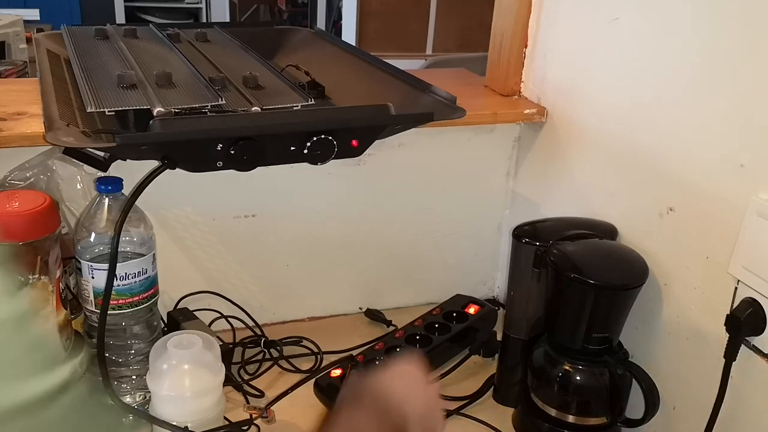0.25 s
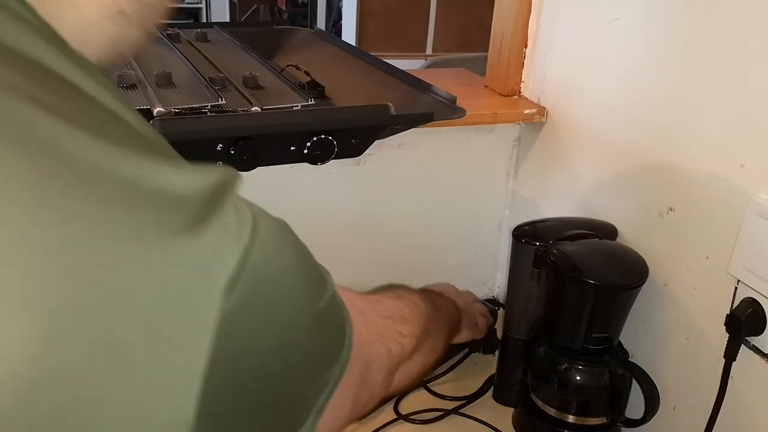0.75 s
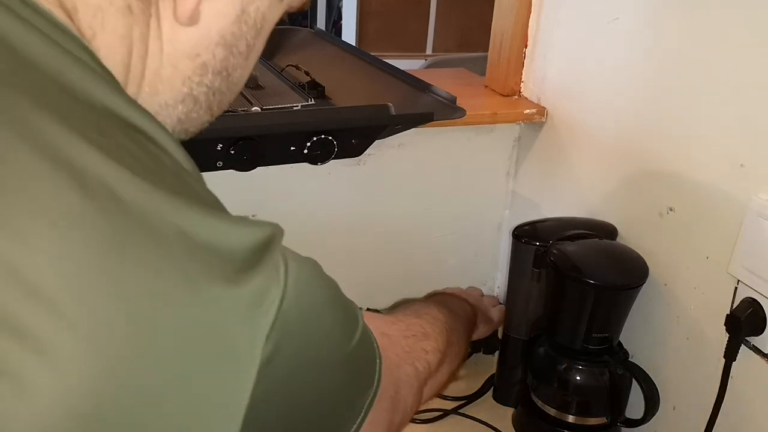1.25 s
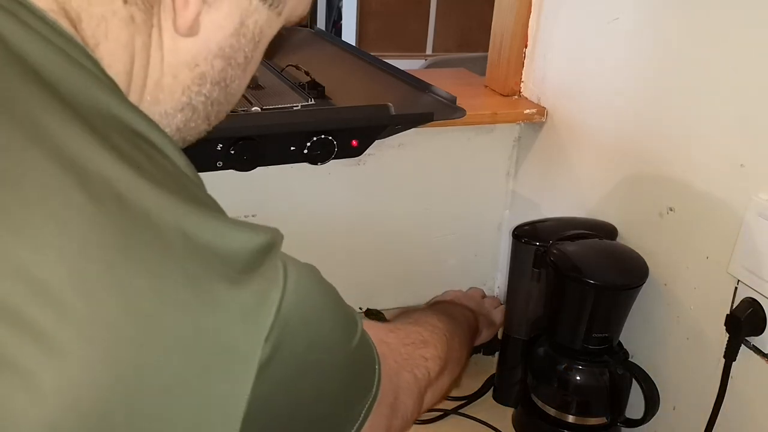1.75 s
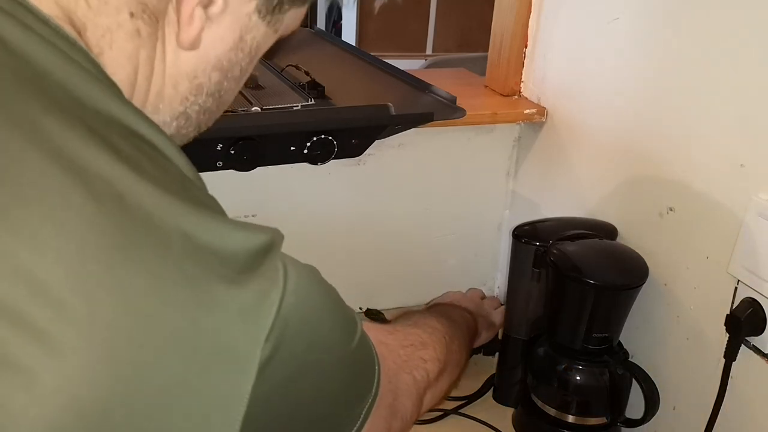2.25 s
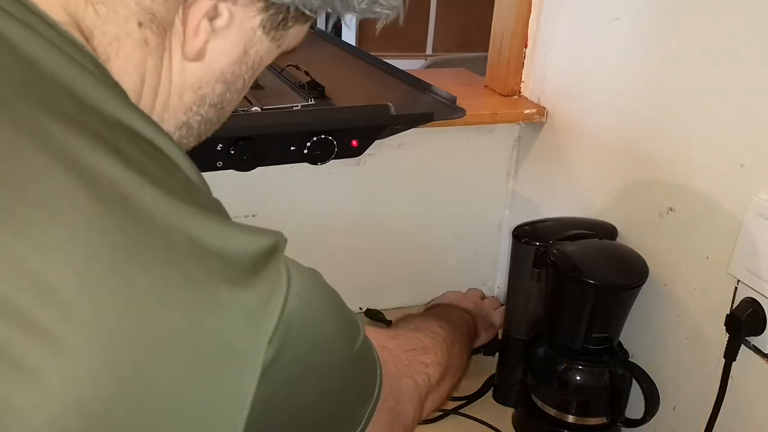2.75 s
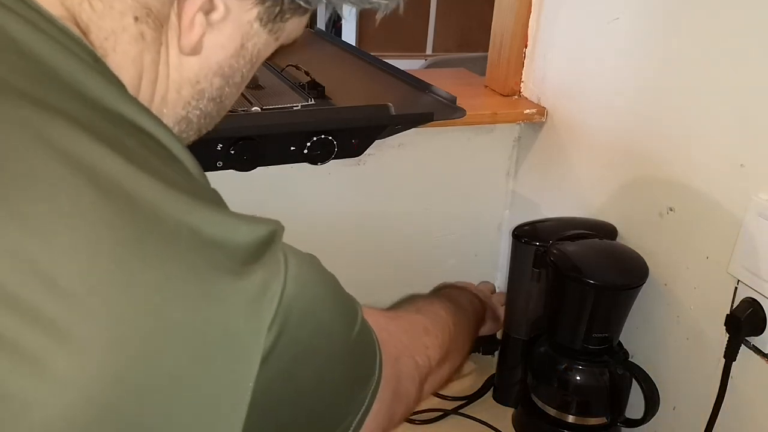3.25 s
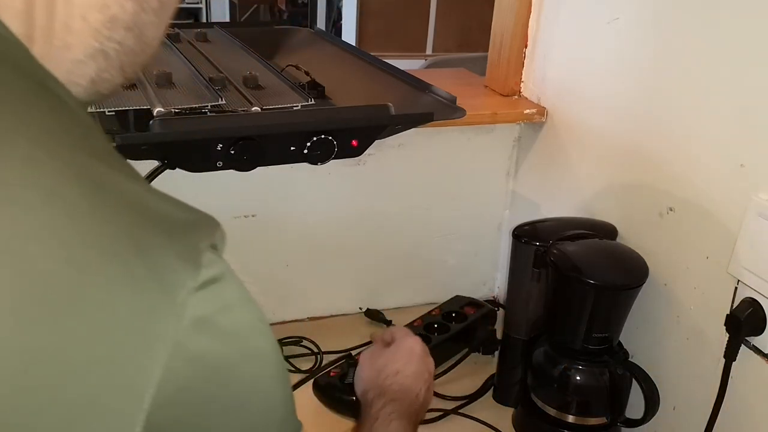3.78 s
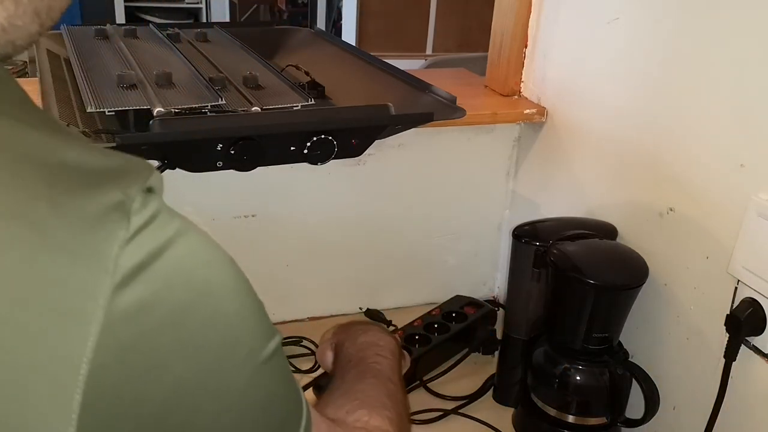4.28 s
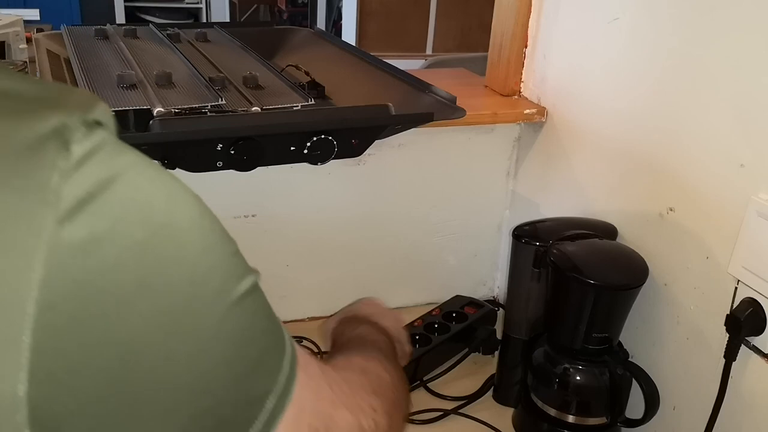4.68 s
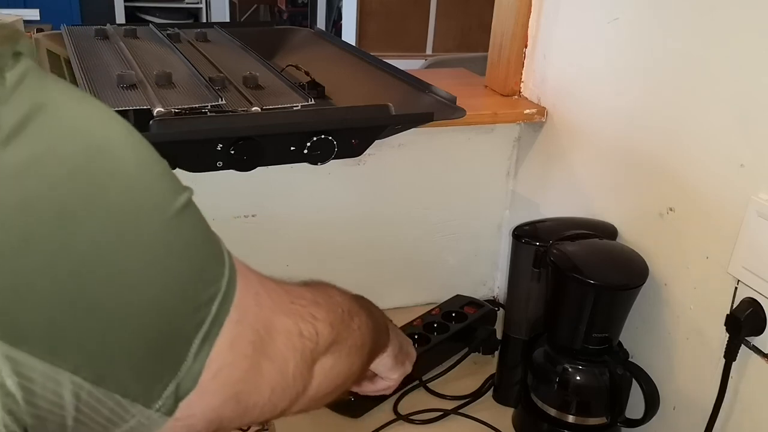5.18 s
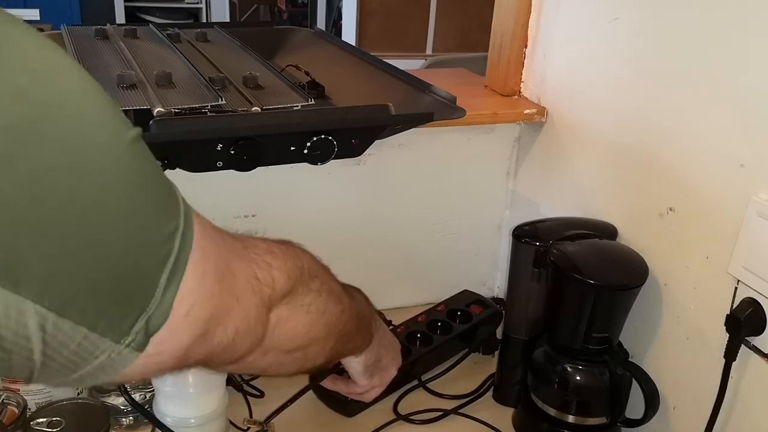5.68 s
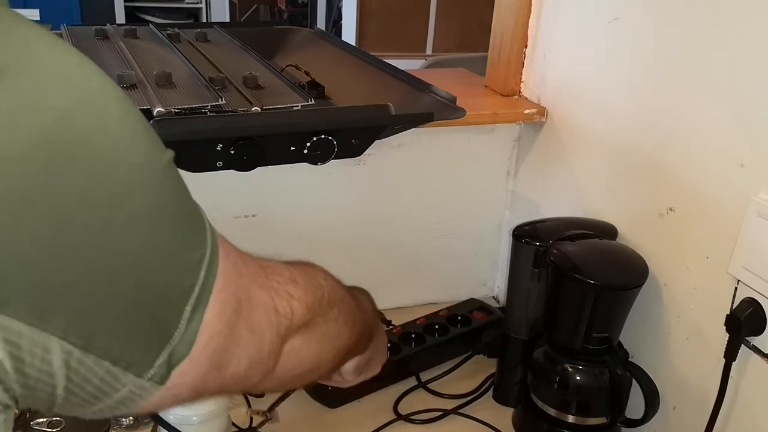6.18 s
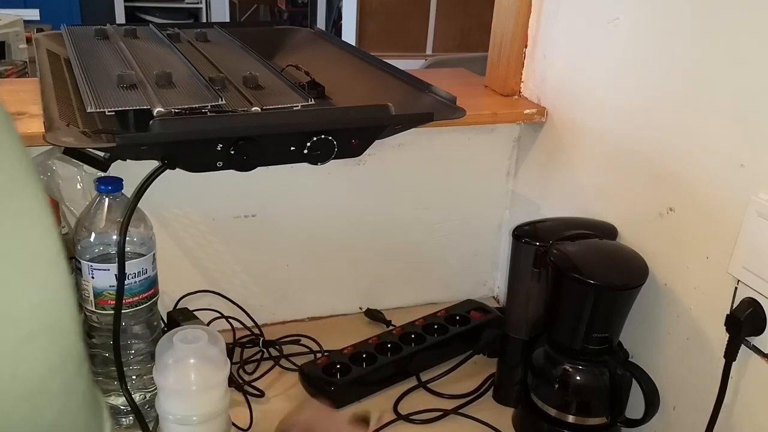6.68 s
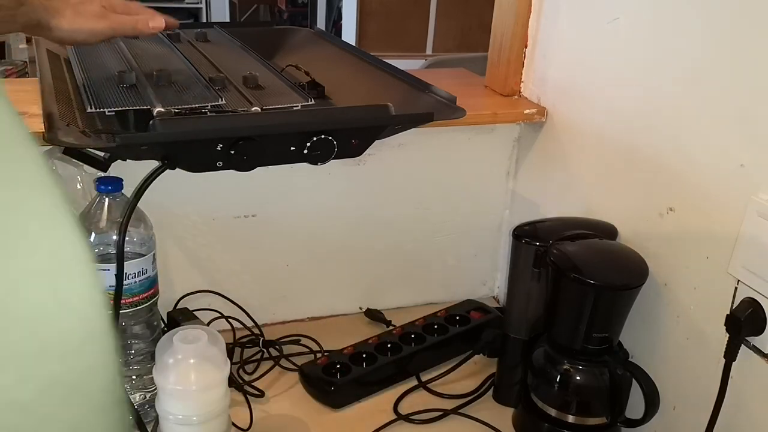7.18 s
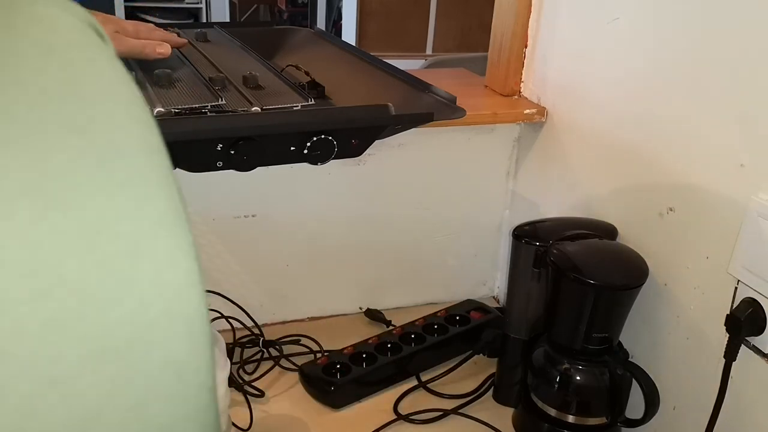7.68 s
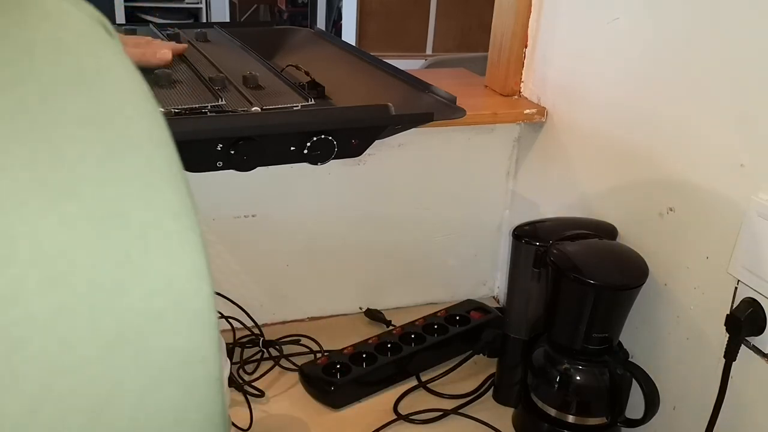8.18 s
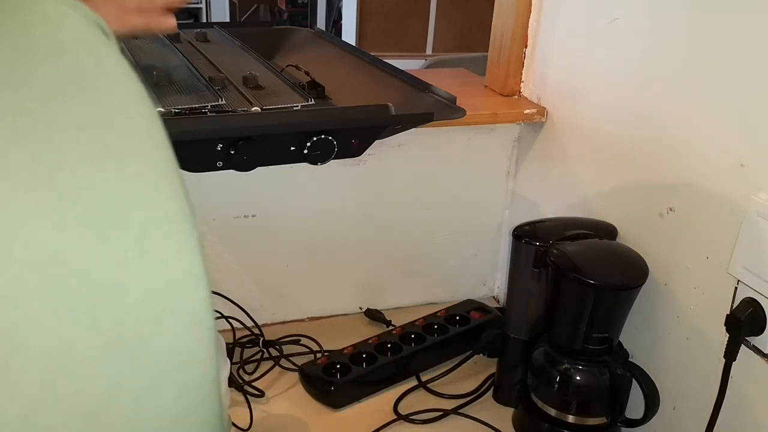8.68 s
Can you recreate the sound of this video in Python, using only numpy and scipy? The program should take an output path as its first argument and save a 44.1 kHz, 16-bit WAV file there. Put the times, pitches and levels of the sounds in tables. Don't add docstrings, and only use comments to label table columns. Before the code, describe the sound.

A quiet small hard room with a faint hush and very deep, barely audible rumble. A small crisp click opens at 0.0 s, followed by soft cloth rustle and finger drags. A duller plastic clack comes at 0.8 s, a thin bright click at 1.3 s with a faint cable rub, then near stillness. At 3.0 s a tiny slip leads to a sharp click at 3.07, and a fuller clack follows at 3.4. Faint fumbling, then a thin bright metallic click at 4.5. Minor taps lead into 5.6 s. Light scrapes from 5.9 build to the loudest event, a piercing switch snap at 6.1 with a heavier plastic knock right behind it and a short lively echo. Cloth swishes at 6.7, a solid mid-pitched clack lands at 7.3, and soft brushing taps on a metal tray come at 8.3, fading to quiet hush by 9.

```python
import sys
import numpy as np
from scipy import signal
from scipy.fft import rfft, irfft
from scipy.io import wavfile
from scipy.ndimage import uniform_filter1d

SR = 44100
rng = np.random.default_rng(int(sys.argv[2]) if len(sys.argv) > 2 else 0)


def undo_db(level):
    steps = np.asarray(level, float) / 20
    return 10 ** steps


def dump_mix(stems):
    frames = np.atleast_2d(stems).T
    limited = np.clip(frames, -1, 1)
    pcm = np.round(limited * 32767).astype(np.int16)
    wavfile.write(sys.argv[1], SR, pcm)


N = 393813


def unit(x):
    return x / np.sqrt(np.mean(x ** 2))


def colour(x, table):
    points_hz, points_db = np.array(table).T
    hz = np.maximum(np.fft.rfftfreq(len(x), 1 / SR), 1)
    gain = undo_db(np.interp(np.log(hz), np.log(points_hz), points_db))
    return irfft(rfft(x) * gain, len(x))


def band(x, lo_hz, hi_hz):
    sos = signal.butter(2, [lo_hz, min(hi_hz, .45 * SR)], "bandpass", fs=SR, output="sos")
    return unit(signal.sosfilt(sos, x))


def walk(rate_hz):
    hold = int(SR / rate_hz)
    steps = np.repeat(rng.standard_normal(N // hold + 1), hold)
    smooth = uniform_filter1d(uniform_filter1d(steps, hold), hold)
    return unit(smooth[:N])


def modes(table):
    hz, db, t60_s = np.array(table).T[:, :, None]
    t = np.arange(SR // 2) / SR
    return undo_db(db) * np.sin(2 * np.pi * hz * t) * np.exp(-np.log(1000) * t / t60_s)


def damped(table):
    return [(hz, db, 11 / hz) for hz, db in table]


def rattle(noise, ms, rise=0.14):
    t = np.arange(len(noise)) / SR / (max(ms, .5) / 1000)
    return noise * (1 - np.exp(-t / rise)) * np.exp(-t)


def add(out, s, x, db):
    i = int(s * SR)
    x = x[:N - i]
    out[i:i + len(x)] += x * undo_db(db) / np.max(np.abs(x))


def air():
    # (f/Hz, level/dB)
    hush = [(18, -32), (30, -2.5), (53, -24.5), (71, -14.5), (93, -29.5), (145, -24.5), (287, -40),
            (345, -36.5), (384, -36.5), (632, -46), (2290, -56.5), (9460, -58), (16000, -60)]
    tone = unit(colour(rng.standard_normal(N), hush))
    return undo_db(-58.5 + 1.0 * walk(2.1)) * tone


def rumble():
    # (t/s, level/dB)
    trembling = [(0.0, -52), (0.17, -45.5), (0.37, -63), (0.47, -52), (2.11, -49), (2.41, -70),
                 (2.64, -48.5), (3.21, -60), (3.53, -45), (3.78, -58), (5.89, -61), (6.04, -49),
                 (6.52, -64.5), (6.96, -46), (7.09, -55.5), (8.93, -56)]
    hz = 18.0 + 0.96 * walk(3.2)
    s, db = np.array(trembling).T
    level_db = np.interp(np.arange(N) / SR, s, db)
    return undo_db(level_db) * np.sqrt(2) * np.sin(2 * np.pi * np.cumsum(hz) / SR)


def rustle():
    # (t/s, fade/s, cloth hiss level/dB, cable shuffle level/dB)
    moves = [(0, 0.046, -81, -70), (.1, 0.28, -68, -84), (.75, 0.14, -78, -88), (1.2, 0.47, -82.5, -81.5),
             (3.3, 0.33, -76.5, -82), (4.45, 0.27, -82.5, -84), (5.18, 0.18, -77.5, -83.5),
             (5.6, 0.11, -84.5, -82), (6.05, 0.12, -76.5, -82), (6.5, 0.33, -72, -72),
             (6.7, .06, -59.5, -102), (6.95, 0.06, -68, -86), (7.15, 0.14, -71.5, -81),
             (7.6, 0.21, -85, -79), (8.4, 0.092, -74, -75)]
    still_cloth_db, still_cables_db = -88.5, -99
    s, fade_s, cloth_db, cables_db = np.array(moves).T
    swell = np.exp(-np.abs(np.arange(N)[:, None] / SR - s) / fade_s)
    cloth = swell @ undo_db(cloth_db) + undo_db(still_cloth_db)
    cloth = cloth * undo_db(-3 + 1.5 * walk(7.5)) * band(rng.standard_normal(N), 5000, 14000)
    cables = swell @ undo_db(cables_db) + undo_db(still_cables_db)
    cables = cables * undo_db(2 * walk(31)) * band(rng.standard_normal(N), 250, 1500)
    return cloth + cables


def rings():
    # (f/Hz, level/dB)
    tray_modes = [(660, -60), (2200, -66), (4200, -61.5), (4700, -69), (6450, -63)]
    # (t/s, f/Hz, level/dB, scrape/ms)
    squeaks = [
        (1.19, 2060, -74.5, 83),
        (1.6, 2005, -78, 200),
    ]
    # (t/s, f/Hz, level/dB, scrape/ms)
    free_parts = [(0.806, 790, -40, 18), (0.85, 866, -36.5, 24), (1.344, 773, -47.5, 25),
                  (3.067, 1594, -35, 9.2), (4.521, 5950, -27.5, 8.9), (4.52, 1650, -42, 8),
                  (5.624, 423, -51, 27), (5.82, 1646, -61, 12), (7.345, 556, -37, 15)]
    # (t/s, f/Hz, level/dB, scrape/ms)
    held_parts = [(0.027, 11400, -34, 16), (0.028, 2380, -45, 11), (0.028, 4000, -45, 7.1),
                  (0.82, 953, -29.5, 32), (1.338, 6940, -36, 21), (1.34, 7700, -44.5, 13),
                  (1.34, 1040, -50.5, 18), (3.03, 1350, -40, 9.9), (3.032, 830, -42, 29),
                  (3.067, 1150, -37, 11.4), (3.066, 11800, -23.5, 6.5), (4.2, 2050, -64.5, 34),
                  (4.392, 2320, -65, 9), (4.5, 1290, -57, 30), (4.522, 2120, -44, 12),
                  (4.519, 2760, -33.5, 4.3), (6.076, 1280, -32.5, 9.8), (6.098, 2606, -16.5, 7.4),
                  (6.098, 11700, -11, 12), (6.545, 1390, -47.5, 8.4), (6.668, 9000, -49.5, 3.4),
                  (7.336, 724, -23, 5), (7.336, 2190, -28, 5.4), (7.34, 1444, -27, 21.4)]
    tray = [(8.33, hz, db, 170) for hz, db in tray_modes]
    out = np.zeros(N)
    for table, cycles in ((tray + squeaks, 150), (free_parts, 45), (held_parts, 24)):
        scrapes = rng.standard_normal((len(table), 12000))
        for (s, hz, db, ms), noise in zip(table, scrapes):
            push = rattle(noise, ms / 2, rise=0.85)
            ring = modes([(hz, 0, cycles / hz)])[0]
            add(out, s, signal.fftconvolve(push, ring), db)
    return out


def blows(table, ms, rise, spot_db=1.5):
    # (f/Hz, level/dB, t60/s)
    counter = [(86.4, -7.5, 0.33), (124.94, -7, .2), (180.9, -5.5, 0.29), (193.4, -11, 0.42),
               (229.2, 2.5, 0.16), (352, -11.5, 0.33)]
    # (f/Hz, level/dB, t60/s)
    case = [(447, -9.5, 0.087), (504, -10.5, 0.18), (602.5, 1, 0.051), (707, -1.5, 0.046), (792, -1.5, .03),
            (942, 0.5, 0.023)]
    # (f/Hz, level/dB)
    rocker = [(1060, -0.5), (1270, -0.5), (1550, -1), (1916, 1), (2300, 0.5), (2750, -2)]
    # (f/Hz, level/dB)
    springs = [(7700, 0.5), (8900, 4.5), (10200, 2.5), (11600, 0.5), (13000, 0), (14600, -4.5)]
    # (f/Hz, level/dB)
    pins = [(3400, -1), (4100, -0.5), (4900, 1), (5800, 3.5), (6700, 4)]
    bodies = [modes(b) for b in (damped(springs), counter, case, damped(rocker), damped(pins))]
    out = np.zeros((3, N))
    chance = rng.standard_normal((len(table), 8000))
    for (s, springs_db, counter_db, case_db, rocker_db), row in zip(table, chance):
        pins_db = (springs_db + rocker_db) / 2 - 2
        levels_db = springs_db, counter_db, case_db, rocker_db, pins_db
        push = rattle(row[100:], ms, rise)
        for k, body in enumerate(bodies):
            weights = undo_db(spot_db * row[20 * k:20 * k + len(body)]) * (-1) ** np.arange(len(body))
            ring = weights @ body
            near = signal.fftconvolve(push, ring)
            add(out[0], s, near, levels_db[k])
            peak_ratio = np.max(np.abs(ring)) / np.max(np.abs(near))
            same_energy = peak_ratio * np.linalg.norm(near) / np.linalg.norm(ring)
            add(out[1 + k % 2], s + rise * ms / 1000, ring, levels_db[k] + 20 * np.log10(same_energy))
    return out


def room(x, build_ms=6):
    # (f/Hz, t60/s, level/dB)
    echo = [(100, 0.36, -4), (300, 0.39, -6), (1055, 0.43, -7.5), (2940, 0.39, -6), (8300, 0.44, -7.5),
            (15000, 0.13, -2)]
    t = np.arange(SR) / SR
    hz, t60_s, db = np.array(echo).T
    tail = 0
    for f in 60 * 2 ** np.arange(0, 8.3, .5):
        decay = np.exp(-np.log(1000) * t / np.interp(np.log(f), np.log(hz), t60_s))
        build = 1 - np.exp(-t * 1000 / build_ms)
        part = band(rng.standard_normal(SR), f / 2 ** .25, f * 2 ** .25) * decay * build
        part = part / np.sqrt(np.sum(part ** 2)) * np.sqrt(f / SR)
        tail = tail + undo_db(np.interp(np.log(f), np.log(hz), db)) * part
    return signal.fftconvolve(x, tail)[:N]


def microphone(x):
    # (f/Hz, level/dB)
    response = [(20, 2), (5000, 2), (7500, -3.5), (10000, 7.5), (12500, -0.5), (15500, -0.5), (16200, -30)]
    return colour(x, response)


def scene():
    # (t/s, contact springs level/dB, counter level/dB, case level/dB, rocker level/dB)
    snaps = [(0.0261, -34.5, -62, -51, -55), (0.8351, -37.5, -51, -44, -33), (1.3369, -37, -64, -47.5, -64),
             (2.937, -60.5, -60.5, -66, -71), (2.9975, -45.5, -57, -61.5, -51),
             (3.0645, -23.5, -61.5, -46, -30), (3.356, -54.5, -55.5, -55.5, -43.5),
             (3.4257, -29.5, -34, -29.5, -31.5), (4.4174, -60.5, -60, -80, -71),
             (4.5185, -24, -53, -57, -40), (5.3694, -67, -67, -70, -76), (5.5351, -74, -61, -59.5, -65),
             (5.6204, -55, -46.5, -47, -50.5), (5.8222, -78, -63, -68, -70), (6.097, -4.5, -43, -34, -24.5),
             (6.1024, -15.5, -39.5, -30.5, -29.5), (6.1253, -16, -26.5, -18, -22.5),
             (6.1384, -28, -28, -23, -18.5), (6.5443, -54.5, -63, -42, -58.5),
             (6.756, -45, -55.5, -65, -53.5), (7.027, -61, -59.5, -63, -69), (7.0987, -61, -59, -59, -63.5),
             (7.3355, -33.5, -41.5, -23.5, -22), (7.4578, -65, -72, -65, -51)]
    slips = [(0.817, -46.5, -83, -41.5, -41.5), (3.03, -59, -62, -44.5, -49.5),
             (6.038, -51, -62.5, -57.5, -53.5), (6.058, -48.5, -64, -57.5, -56),
             (6.0755, -27, -53, -37, -27.5), (7.219, -36.5, -61.5, -63, -40.5)]
    drags = [(0.6259, -64, -62.5, -89, -67), (0.7027, -62, -63, -79, -55), (1.2396, -56, -76, -63, -64),
             (1.808, -58.5, -57, -93, -73), (2.9674, -65, -55.5, -63, -66), (4.1696, -83, -56.5, -56, -59),
             (4.2097, -69, -71, -75, -72), (4.6606, -56, -49.5, -46.5, -50.5),
             (5.1294, -64, -60.5, -63, -76), (5.9294, -60.5, -57, -53, -65),
             (5.968, -60.5, -47.5, -43.5, -54), (6.01, -58, -56, -43.5, -46),
             (6.5986, -61, -63.5, -61, -69), (6.6687, -44.5, -64, -52.5, -56),
             (6.6977, -49, -73.5, -76, -77), (7.239, -36, -64, -63, -43), (8.268, -42, -45, -49, -50),
             (8.2776, -42, -55, -43, -44.5), (8.3124, -42.5, -49, -40, -38.5), (8.334, -54, -49, -46, -48),
             (8.3899, -51.5, -46, -61, -47)]
    hits = blows(snaps, ms=5.0, rise=.25)
    hits = hits + blows(slips, ms=13, rise=0.12)
    near, *far = hits + undo_db(-6) * blows(drags, ms=19, rise=0.43)
    rest = rings() + rustle()
    echoes = room(far[0] + rest) + room(far[1])
    heard = microphone(near + rest + echoes)
    return (heard + air() + rumble())[None]


def roll_off(x):
    return signal.sosfilt(signal.butter(12, 16830, fs=SR, output="sos"), x)


def record(dry):
    mix = 0.87 * np.tanh(dry / 0.75)
    return roll_off(mix)


dry = scene()
out = record(dry)
dump_mix(out)
```